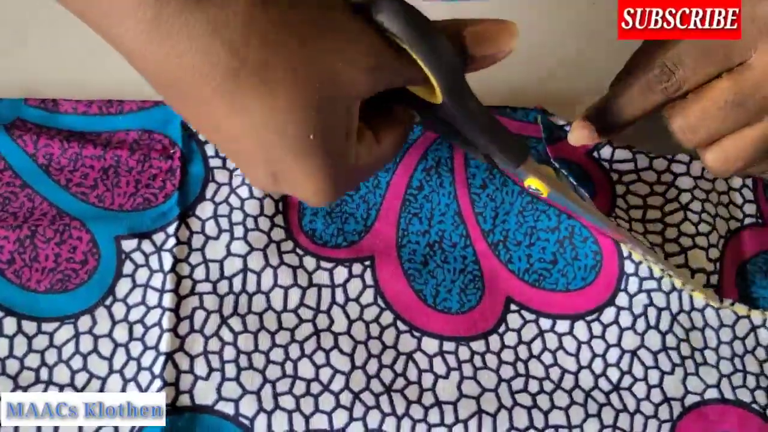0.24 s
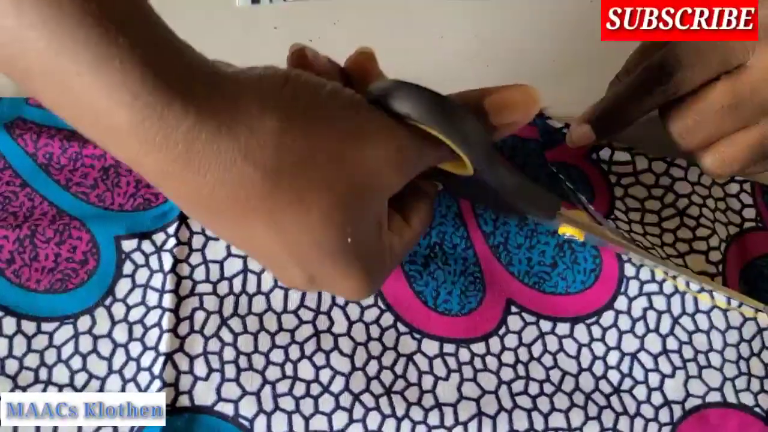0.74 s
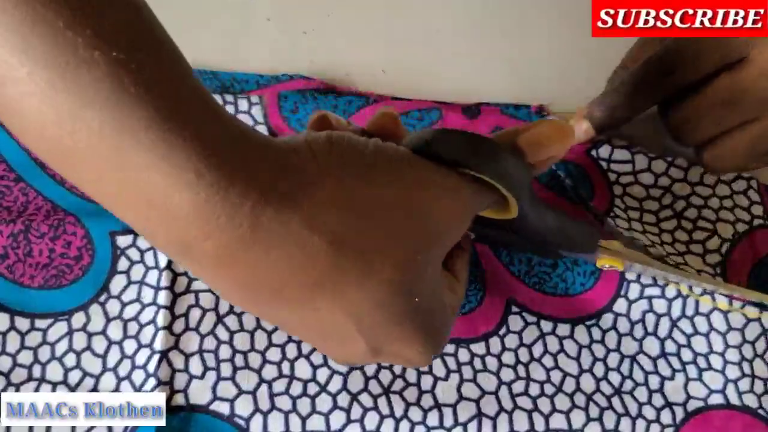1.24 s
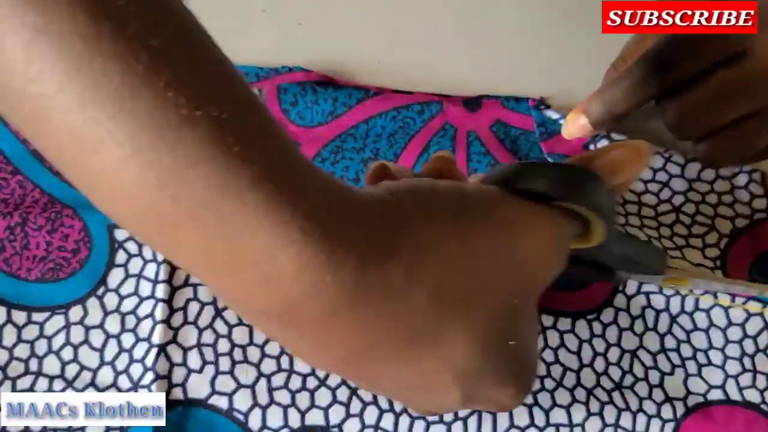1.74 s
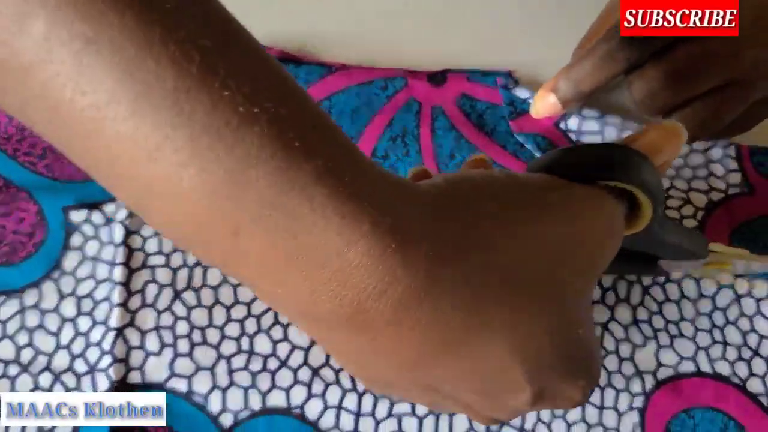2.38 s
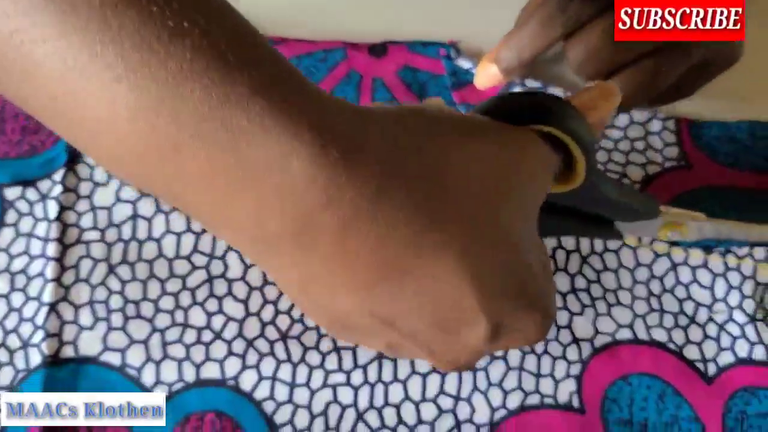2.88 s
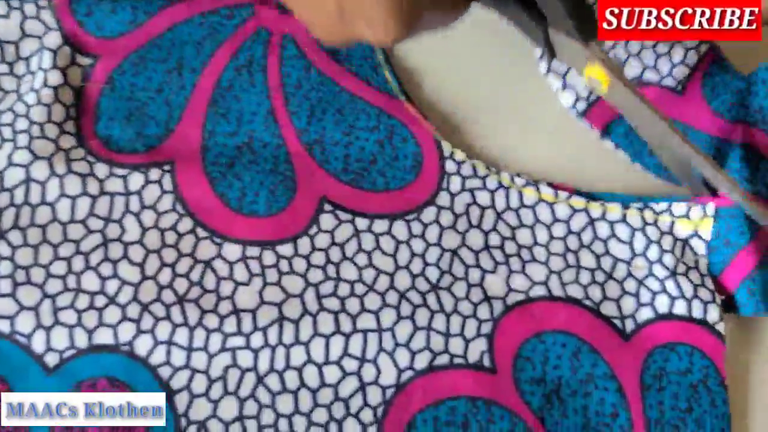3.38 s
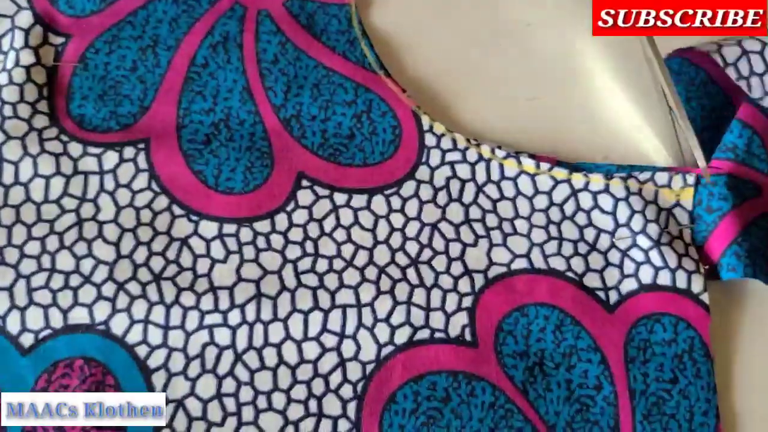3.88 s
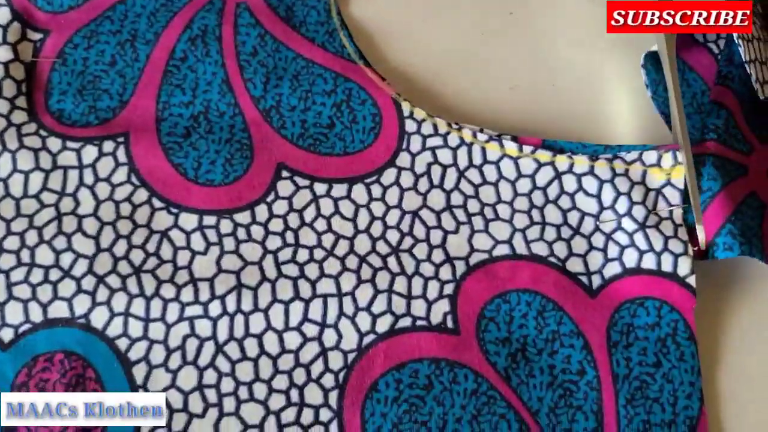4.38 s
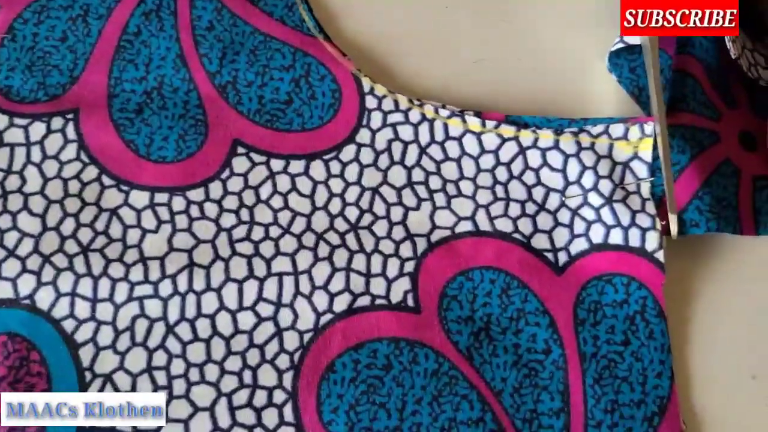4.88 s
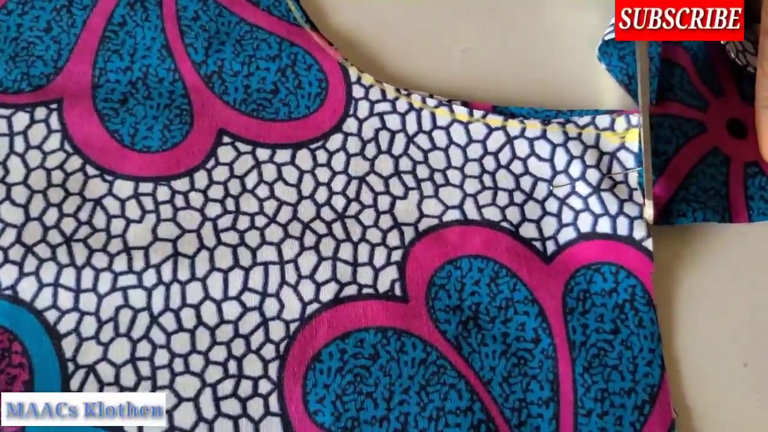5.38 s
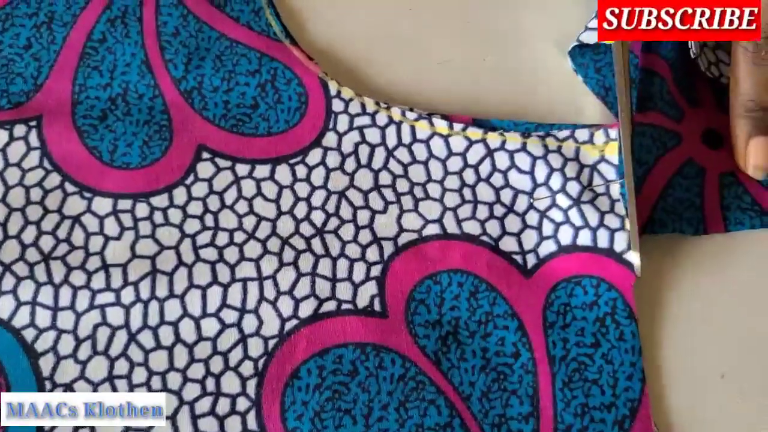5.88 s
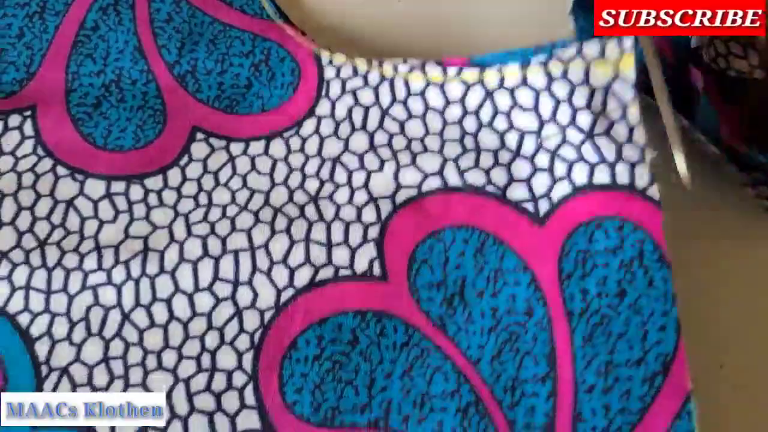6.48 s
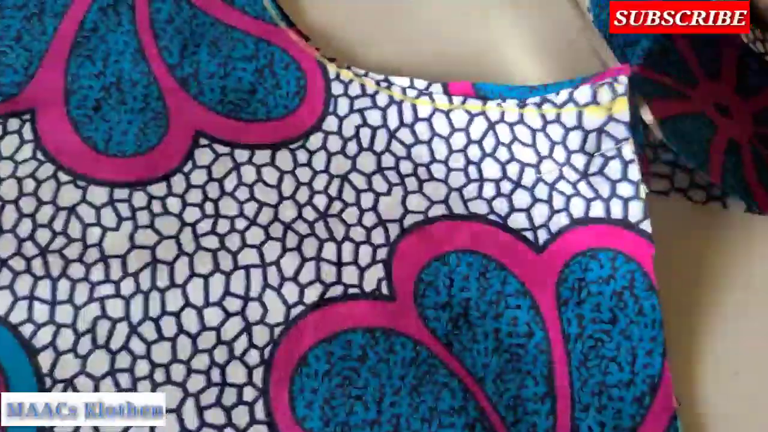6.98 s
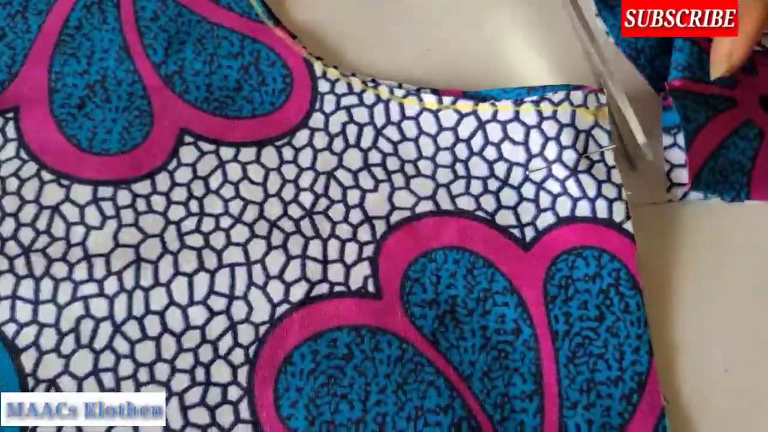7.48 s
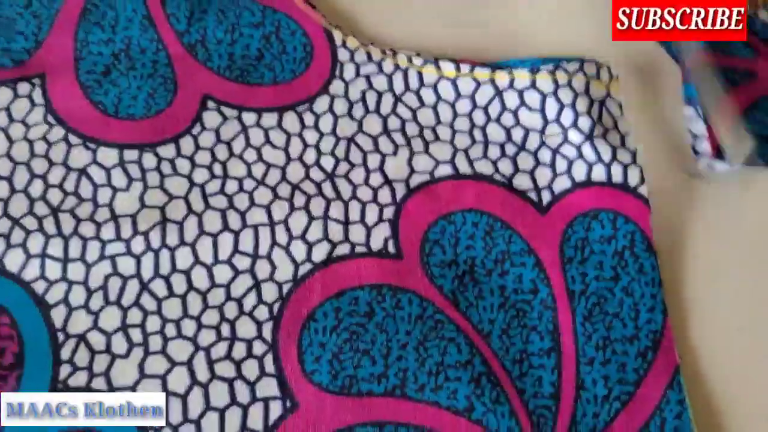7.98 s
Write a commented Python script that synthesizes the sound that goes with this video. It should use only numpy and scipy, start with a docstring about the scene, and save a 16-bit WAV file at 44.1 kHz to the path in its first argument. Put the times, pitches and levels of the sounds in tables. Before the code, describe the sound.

Crisp fabric-cutting snips with steely hiss and table thumps, a quiet gap, a few slower cuts, then cloth rustle and a final hard knock.

```python
"""Small room, worktable: heavy tailor's scissors cut cotton close to a phone.
Each stroke snaps a run of threads (random impulses): the blades hiss and ring, and stick-slip pushes
drum on the table modes. Between strokes the scissors open, knock and slide on (impulses and slips through
the same modes), cloth brushes past (filtered noise) and a hand bumps the table (damped sines).
A small bird chirps far off (falling sines with reflections) over room tone and hiss (coloured noise)."""
import sys
import numpy as np
from scipy import signal
from scipy.fft import rfft, irfft
from scipy.io import wavfile
from scipy.ndimage import uniform_filter1d

SR = 44100
rng = np.random.default_rng(int(sys.argv[2]) if len(sys.argv) > 2 else 0)


def log_audio(samples):
    """Write samples as a 16-bit WAV file to the path given in sys.argv[1]."""
    # one column per channel
    frames = np.atleast_2d(samples).T
    # limit to full scale, then quantise
    limited = np.clip(frames, -1, 1)
    pcm = np.round(limited * 32767).astype(np.int16)
    wavfile.write(sys.argv[1], SR, pcm)


N = 363428
T = np.arange(N) / SR


def undb(db):
    """Decibels to gain."""
    return 10 ** (np.asarray(db) / 20)


def unit(h):
    """Impulse response scaled to pass white noise at the same level."""
    return h / np.sqrt(np.mean(np.sum(h ** 2, axis=-1)))


def through(x, h):
    """Sound through a one- or two-channel impulse response."""
    return signal.fftconvolve(np.atleast_2d(x), np.atleast_2d(h), axes=-1)[:, :N]


def colour(points, size=1024):
    """Minimum-phase impulse response with the given spectrum, by folding the cepstrum."""
    point_hz, point_db = np.transpose(points)
    bin_hz = np.maximum(np.arange(size // 2 + 1) * SR / size, 1)
    gain = undb(np.interp(np.log(bin_hz), np.log(point_hz), point_db))
    cepstrum = irfft(np.log(gain))
    cepstrum[1:size // 2] *= 2
    cepstrum[size // 2 + 1:] = 0
    return irfft(np.exp(rfft(cepstrum)))


def ring(modes, size=12000):
    """Impulse response of damped modes, all set going at once."""
    t = np.arange(size) / SR
    h = np.zeros(size)
    for hz, width_hz, db in modes:
        decay = np.exp(-np.pi * width_hz * t)
        h += undb(db) * width_hz * decay * np.cos(2 * np.pi * hz * t)
    return unit(h)


def band(x, lo_hz, hi_hz, order=3):
    """Butterworth band-pass."""
    sos = signal.butter(order, [lo_hz, min(hi_hz, SR * .45)], "band", fs=SR, output="sos")
    return signal.sosfilt(sos, x)


def tail(t60_s, size=22050):
    """Dense reflections dying away, unrelated left and right."""
    t = np.arange(size) / SR
    return unit(rng.standard_normal((2, size)) * np.exp(-np.log(1000) * t / t60_s))


def snaps(rate_hz, spread_db):
    """Irregular tiny impulses of uneven size; rms 1."""
    hits = rng.random(N) < rate_hz / SR
    signs = rng.choice([-1, 1], N)
    x = hits * signs * undb(spread_db * np.minimum(rng.standard_exponential(N), 4))
    return x / x.std()


def walk(rate_hz):
    """Smooth random drift, spread near 1."""
    k = max(int(SR / rate_hz), 1)
    x = uniform_filter1d(np.repeat(rng.standard_normal(N // k + 1), k)[:N], k)
    return x / x.std()


def burst(impulses, decay_s):
    """Each impulse becomes a short noise burst of equal energy, unrelated left and right; the power decays."""
    keep = np.exp(-1 / (decay_s * SR))
    power = signal.lfilter([1 - keep], [1, -keep], impulses ** 2)
    return np.sqrt(power) * rng.standard_normal((2, N))


def stick_slip(rate_hz, wander, jitter, spread_db):
    """Run of slips: the pace drifts, each slip has its own timing and size; rms 1."""
    pace_hz = rate_hz * np.exp(wander * walk(14) + jitter * walk(400))
    phase = np.cumsum(pace_hz) / SR
    slips = np.diff(np.floor(phase), prepend=0)
    x = slips * undb(spread_db * np.clip(rng.standard_normal(N), -2, 2))
    return x / x.std()


def place(x, pan_db):
    """Level difference, left minus right, of pan_db."""
    return x * undb(np.array([[pan_db], [-pan_db]]) / 2)


def crosswise():
    """True while the scissors have left the curve and work on the cross cut."""
    from_s, to_s = 4, 6.4
    return (T > from_s) & (T < to_s)


def room(x):
    """Bare walls: the middle range rings longest, the treble dies soonest; the bass is alike on both sides."""
    bass = undb(-11.5) * band(tail(0.29)[:1], 69, 650)
    middle = undb(-8) * band(tail(.34), 600, 4500)
    treble = undb(-20) * band(tail(.15), 4500, 15000)
    return x + through(x, bass + middle + treble)


def air(alike_hz=450, level_db=-56):
    """Room tone and microphone hiss: coloured noise, bass shared by both sides; the shared part swells a little."""
    # noise spectrum: (frequency [Hz], relative level [dB])
    air_spectrum = [(15, -33), (25, -7), (91, 2), (148, -10), (247, -13.5), (380, -17), (670, -24.5),
                    (1590, -30), (2600, -27.5), (5000, -31), (6800, -28), (9000, -42), (11000, -36.5),
                    (15700, -41)]
    mid, side = through(rng.standard_normal((2, N)), unit(colour(air_spectrum, size=8192)))
    side = signal.sosfilt(signal.butter(1, alike_hz, "high", fs=SR, output="sos"), side)
    mid = mid * undb(0.25 * walk(3.67))
    return undb(level_db) * (mid + undb(-1.0) * side * np.array([[1], [-1]]))


def bird():
    """Short falling whistles with a slight warble, blurred by reflections."""
    # chirps: (start [s], start pitch [Hz], end pitch [Hz], length [s], relative level [dB])
    chirps = [(1.833, 3540, 2650, 0.045, -48), (2.077, 3570, 2770, 0.025, -37),
              (4.084, 3620, 3040, .04, -59), (5.94, 3600, 2880, 0.044, -55),
              (6.195, 3530, 2780, 0.042, -39), (6.97, 3500, 3000, 0.039, -42.5),
              (7.274, 4850, 4070, 0.045, -58), (7.311, 3660, 2900, 0.046, -55)]
    out, warble = np.zeros(N), 1 + 0.0057 * walk(500)
    for s, start_hz, end_hz, length_s, db in chirps:
        k, i = int(length_s * SR), int(s * SR)
        hz = np.geomspace(start_hz, end_hz, k) * warble[i:i + k]
        out[i:i + k] += undb(db) * np.hanning(k) * np.sin(2 * np.pi * np.cumsum(hz) / SR)
    return undb(-5) * (out + through(out, tail(.18)))


def brushes():
    """Cloth brushes past the blades and the table edge: short, narrow, scratchy swishes."""
    # swishes: (centre time [s], length [s], centre frequency [Hz], level before panning [dB])
    swishes = [(3.72, 0.047, 1070, -53.5), (4.334, 0.35, 6270, -69), (6.524, 0.023, 1560, -50.5),
               (6.583, 0.055, 1100, -47), (6.616, 0.028, 1210, -45), (6.993, 0.03, 2350, -57),
               (7.672, 0.15, 4730, -56), (7.897, 0.2, 2260, -57), (7.865, 0.11, 1810, -48.5)]
    out, fibres = np.zeros((2, N)), burst(snaps(900, 1.2), decay_s=0.00085)
    for s, length_s, hz, db in swishes:
        k, i = int(length_s * SR), int((s - length_s / 2) * SR)
        swish = band(fibres[:, i:i + k], hz / 1.15, hz * 1.15, order=2)
        out[:, i:i + k] += undb(db) * np.hanning(k) * swish / swish.std()
    return place(out, -1.5)


def bumps(decay_s=0.0063):
    """A hand leans on the table: heavily damped low sines."""
    # soft bumps: (time [s], level before damping [dB], pitch [Hz])
    hand_bumps = [(6.305, -26.5, 75), (6.337, -31, 47.97), (6.765, -29, 65.9)]
    out = np.zeros(N)
    for s, db, hz in hand_bumps:
        t = np.maximum(T - s, 0)
        out += undb(db) * np.sin(2 * np.pi * hz * t) * np.exp(-np.minimum(t / decay_s, 50))
    return out


def table(soft_push, hard_push, lowest_hz, soft_hz, hard_hz):
    """Soft pushes reach the low tabletop modes, hard steel contact the upper ones, with a little chatter."""
    # worktable modes: (frequency [Hz], width [Hz], relative level [dB])
    table_modes = [(96.3, 26.8, 9.5), (129, 21, -6), (181.8, 32.5, 2), (231.8, 49, 2), (275, 37, -2.5),
                   (315, 11.6, -2), (423, 14, -7), (551, 105, -3), (619, 54, 0.5), (698.3, 28, 1),
                   (808, 81, -9.5), (901.4, 29, -1.5), (990, 29, -2.5), (1220, 15, -24), (1300, 130, -10.5)]
    body = ring(table_modes)
    soft = soft_push + undb(-19.0) * burst(soft_push, decay_s=0.0029)
    hard = hard_push + undb(-8.0) * burst(hard_push, decay_s=0.013)
    low = through(soft, unit(band(body, lowest_hz, soft_hz, order=3)))
    high = through(hard, unit(band(body, 394, hard_hz, order=5)))
    return place(low, -1.27) + place(high, -1.4)


def shoves():
    """Rumble, scrape and rustle over time: each shove speeds up and runs out, over small hand motions."""
    # scissors and cloth pushed over the table: (fastest moment [s], rise per 20 dB [s], fall per 20 dB [s],
    # relative low rumble [dB], relative scrape [dB], relative cloth rustle [dB])
    pushes = [(0.343, 0.028, 0.11, -31.5, -48.5, -59), (0.850, 0.098, 0.22, -40.5, -59, -66),
              (1.324, 0.12, .1, -36.5, -52.5, -71), (1.770, 0.069, 0.073, -34, -50, -61),
              (2.257, 0.16, .05, -36, -52, -61.5), (2.674, 0.062, 0.054, -37, -53, -77),
              (3.044, 0.047, 0.12, -41, -43.5, -59.5), (3.160, 0.15, 0.044, -40.5, -55, -60.5),
              (3.411, .13, 0.1, -27.5, -46.5, -59.5), (3.618, 0.36, 0.1, -44.5, -60.5, -62.5),
              (3.724, 0.048, .05, -64, -64, -56.5), (3.802, 0.026, .2, -53, -59.5, -60.5),
              (4.126, 0.41, 0.26, -44.5, -58.5, -64), (4.500, 0.37, 0.25, -54.5, -67, -69),
              (5.512, 0.041, 0.14, -38, -47.5, -61.5), (6.013, 0.06, 0.097, -36.5, -51.5, -66),
              (6.526, 0.11, 0.24, -56.5, -57.5, -52.5), (6.963, 0.057, 0.078, -72, -88, -54.5),
              (7.440, 0.024, 0.055, -37.5, -56, -62), (7.559, 0.038, 0.23, -33, -54, -68),
              (7.677, 0.24, 0.25, -36.5, -50, -56.5), (7.851, 0.055, 0.033, -28, -30.5, -55.5),
              (7.906, .03, .11, -36, -47, -62)]
    # spells of work in which the hand never quite rests: (from [s], to [s])
    busy_spells = [(0, 3.25), (5.3, 6.45)]
    fidget_db = (-54.5, -66, -67)  # rumble, scrape, rustle
    busy = sum((T > from_s) & (T < to_s) for from_s, to_s in busy_spells)
    power = np.outer(undb(fidget_db), busy) ** 2
    for s, rise_s, fall_s, *db in pushes:
        speed = undb(-20 * np.minimum(np.maximum((s - T) / rise_s, (T - s) / fall_s), 10))
        power += np.outer(undb(db), speed) ** 2
    return np.sqrt(power)


def slides():
    """The lower blade stutters over the tabletop (stick-slip) and drags the cloth with it."""
    # cloth spectrum: (frequency [Hz], relative level [dB])
    cloth_spectrum = [(650, -25), (1100, -5.5), (2360, -9.5), (4760, -15.5), (6750, -12.5), (8880, -36),
                      (10300, -16.5), (15000, -29)]
    rumble, scrape, rustle = shoves()
    slips = stick_slip(rate_hz=190, wander=.2, jitter=.25, spread_db=4.5)
    wood = table(rumble * slips, scrape * slips, lowest_hz=114.5, soft_hz=299.6, hard_hz=907)
    fibres = burst(rustle * snaps(1500, 1.7), decay_s=0.0015)
    cloth = through(fibres, unit(colour(cloth_spectrum)))
    return undb(-1.0) * wood + undb(-1.0) * place(cloth, -12)


def knocks():
    """Blades meet at the end of a stroke, or scissors drop on the table as they open; duller in the cross cut."""
    # steel on table: (time [s], relative thump [dB], relative hard upper part [dB], relative blade click [dB])
    steel_knocks = [(0.108, -15, -27, -56), (0.324, -18.5, -32, -43), (1.019, -27, -49, -65),
                    (1.139, -12.5, -37, -56), (1.478, -30.5, -50, -65), (1.577, -16.5, -22.5, -54),
                    (1.982, -34, -55, -56), (2.049, -11.5, -21, -43), (2.408, -31, -52, -56),
                    (2.652, -31, -51, -62), (3.013, -30, -53, -66), (3.04, -39, -39, -58),
                    (3.281, -16, -23, -42), (3.435, -28.5, -41, -78), (5.142, -28.5, -31, -66),
                    (5.195, -28, -37, -68), (5.255, -18, -21, -51), (5.274, -18, -46, -36.5),
                    (5.476, -31.5, -39, -63), (5.508, -31, -33, -68), (5.785, -17, -22, -57),
                    (5.999, -34, -37.5, -70), (6.206, -22.5, -27, -43), (6.929, -55, -66, -53),
                    (6.959, -57, -57, -41.5), (7.422, -23, -44, -53), (7.559, -32, -49, -72),
                    (7.857, -18.5, -28, -42), (7.867, -11.5, -33, -30)]
    # click spectrum: (frequency [Hz], relative level [dB])
    click_spectrum = [(900, -36), (1500, -12), (2400, -7), (4000, -15.5), (7000, -16), (9000, -34),
                      (15000, -38)]
    blows, across = np.zeros((3, N)), crosswise()
    for s, *db in steel_knocks:
        blows[:, int(s * SR)] += undb(db)
    blows = blows * undb(17.5)
    along_curve = table(*blows[:2] * ~across, lowest_hz=121.0, soft_hz=336, hard_hz=1374)
    cross_cut = table(*blows[:2] * across, lowest_hz=108, soft_hz=342, hard_hz=796)
    click = through(burst(blows[2], decay_s=0.0055), unit(colour(click_spectrum)))
    return along_curve + cross_cut + place(click, -7.5)


def grip(t, rise_s):
    """The edges take hold: 0 before a stroke, 1 once they cut."""
    return np.clip(t / rise_s, 0, 1) ** 1.05


def swell(t, rise_s, rise_db, hold_s, fall_db_per_s):
    """Gain of an effort that grows to its top, holds and dies away."""
    build_db = -rise_db * np.clip(1 - t / rise_s, 0, 1)
    return undb(build_db - fall_db_per_s * np.maximum(t - rise_s - hold_s, 0))


def strokes():
    """Crunch, fizz, low push and hard push over time: the edges take hold, cut harder, then let go."""
    # closing strokes: (start [s], length [s], time to hardest bite [s], relative thread crunch [dB],
    # relative edge fizz [dB], relative low drumming [dB], relative hard upper part [dB])
    closings = [(0.044, 0.076, 0.061, -42.5, -43, -20, -29), (0.582, .112, 0.092, -42, -43, -24, -33),
                (1.050, 0.094, 0.071, -42, -41, -22, -30.5), (1.488, 0.11, 0.093, -43.5, -44, -21.5, -30),
                (1.965, 0.1, 0.091, -41.5, -46, -22.5, -31), (2.4, 0.08, 0.071, -40, -44.5, -22.5, -30),
                (2.787, 0.072, 0.043, -42, -46, -23, -30), (4.688, 0.041, 0.023, -55.5, -68, -40, -48),
                (4.761, 0.13, 0.098, -52, -63, -43, -49), (5.031, .242, 0.16, -45, -51, -34, -39),
                (5.677, .13, 0.12, -42.5, -46, -25, -36), (6.138, 0.073, 0.074, -41, -45.5, -20.5, -30.5)]
    grip_s, fizz_lead_s = 0.039, 0.0039  # the fizz stops a little before the crunch
    push = dict(rise_db=18, hold_s=0.0024, fall_db_per_s=289)  # builds up to the bite, holds, eases off
    out, t = np.zeros((4, N)), T[:SR]
    for s, length_s, bite_s, *db in closings:
        crunch = swell(t, length_s, rise_db=6, hold_s=0, fall_db_per_s=377)
        fizz = swell(t, length_s - fizz_lead_s, rise_db=8.5, hold_s=0, fall_db_per_s=449)
        low_push = swell(t, bite_s, **push)
        hard_push = swell(t, bite_s, **push)
        course = [crunch, fizz * grip(t, length_s / 2), low_push, hard_push]
        i = int(s * SR)
        out[:, i:i + SR] += undb(db)[:, None] * course * grip(t, grip_s)
    return out


def drumming(press):
    """The lower blade passes the jolts of the cut into the table; the cross cut reaches fewer upper modes."""
    pushes = press * stick_slip(rate_hz=300, wander=.2, jitter=.3, spread_db=4.5)
    along = table(*pushes * ~crosswise(), lowest_hz=72.0, soft_hz=360, hard_hz=1097)
    across = table(*pushes * crosswise(), lowest_hz=65.6, soft_hz=308, hard_hz=806)
    return undb(-1.0) * along + undb(-1.05) * across


def glance(x, lag_s=0.00118, wander=0.12, echo_db=-6):
    """The tabletop reflects the sound: one echo whose lag wanders at random."""
    lag = lag_s * np.exp(wander * uniform_filter1d(walk(12), 2000))
    return x + undb(echo_db) * np.array([np.interp(T - lag, T, side) for side in x])


def shear(crunch, fizz, spectrum, rate_hz, spread_db, catch_db, ring_db, fizz_db):
    """Threads snap between the edges in bunches; each tiny crack rings the steel, with a fizz on top."""
    # blade ringing: (frequency [Hz], width [Hz], relative level [dB])
    blade_modes = [(1740, 23, -5.5), (1992, 20, -13.5), (2492, 21, -1.5), (2675, 23, -2), (2910, 90, -27),
                   (3080, 160, -6), (3200, 28, -7), (3470, 14, -5)]
    # the microphone on the right is nearer to the blades: (frequency [Hz], left minus right [dB])
    side_tilt = [(1500, -1.5), (2500, -6), (5000, -7), (8500, -6.5), (13000, -5.5), (15500, -11)]
    threads = snaps(rate_hz, spread_db) * undb(catch_db * walk(170))
    cracks = burst(threads, decay_s=.0004)
    h = colour(spectrum)
    bite = through(crunch * cracks, unit(band(h, 990, 10970)))
    steel = through(crunch * cracks, ring(blade_modes))
    edge_fizz = through(fizz * cracks, unit(band(h, 9510, 16700)))
    sound = bite + undb(ring_db) * steel + undb(fizz_db) * edge_fizz
    ports = [colour([(hz, side * db / 2) for hz, db in side_tilt]) for side in (1, -1)]
    return through(glance(sound), ports)


def cuts(edges):
    """Along the curve the full blades bite; the cross cut has less gain, less steel ring and more fizz."""
    # cut along the curve: (frequency [Hz], relative level [dB])
    curve_spectrum = [(820, -54), (1400, -1), (1600, -5), (1880, 2), (2120, -3), (2510, -5.5), (2810, -5),
                      (3070, -6), (3880, -10), (6360, -6.5), (7320, -10), (8350, -25), (11400, -4),
                      (13400, 1), (15600, -11)]
    # cut across the cloth: (frequency [Hz], relative level [dB])
    cross_spectrum = [(1000, -5.5), (1400, 2.5), (1600, -19), (1830, 8), (2120, -6), (2600, -1),
                      (3300, -12), (3850, -15), (5000, -7.5), (6000, -9), (7200, -10), (9000, -19.5),
                      (12000, -5), (15600, -12)]
    grit = dict(rate_hz=1700, spread_db=2.3, catch_db=1.6)
    along = shear(*edges * ~crosswise(), curve_spectrum, ring_db=-4.5, fizz_db=1.5, **grit)
    across = shear(*edges * crosswise(), cross_spectrum, ring_db=-17.5, fizz_db=3, **grit)
    return undb(4.0) * along + undb(.5) * across


def scene():
    """Scissors, table and cloth in the room, over the bird and the still air."""
    edges, press = np.split(strokes(), 2)
    handling = slides() + knocks() + bumps() + brushes()
    return room(cuts(edges) + drumming(press) + handling) + bird() + air()


def record(dry):
    """The phone cuts the top: steep elliptic low-pass."""
    top_hz = 15750
    return signal.sosfilt(signal.ellip(10, .2, 70, top_hz, fs=SR, output="sos"), dry)


dry = scene()
out = record(dry)
log_audio(out)
```